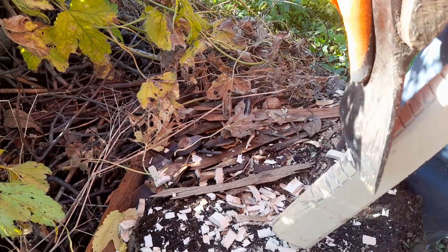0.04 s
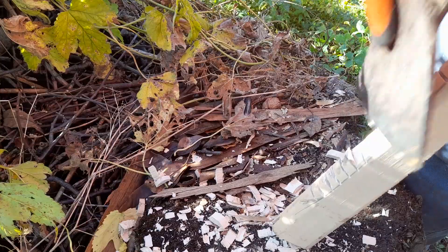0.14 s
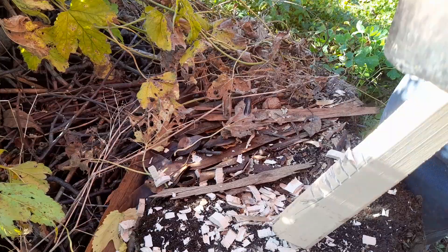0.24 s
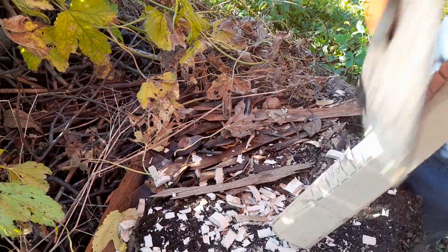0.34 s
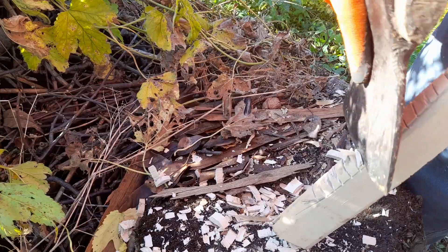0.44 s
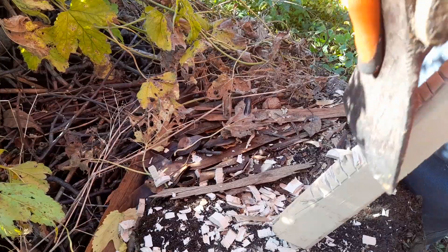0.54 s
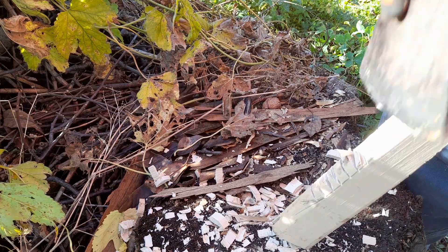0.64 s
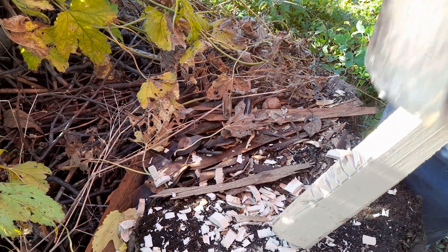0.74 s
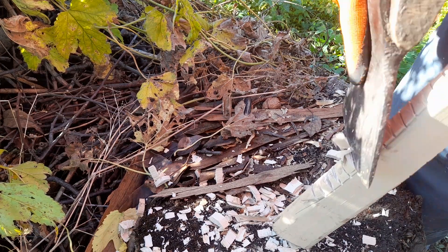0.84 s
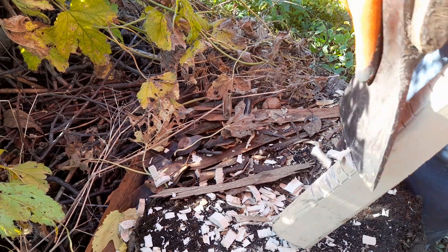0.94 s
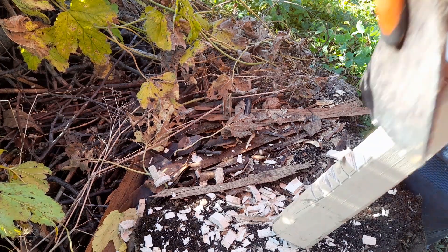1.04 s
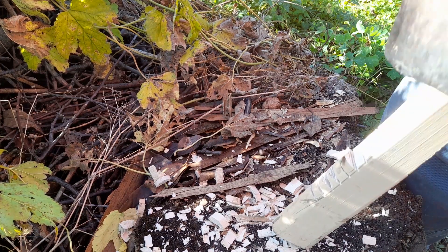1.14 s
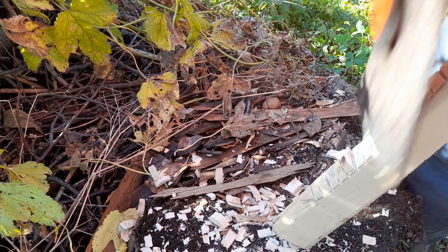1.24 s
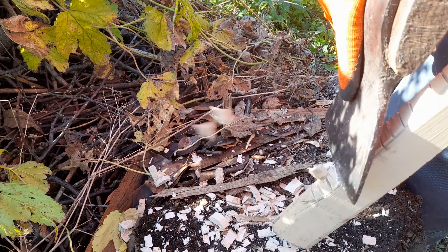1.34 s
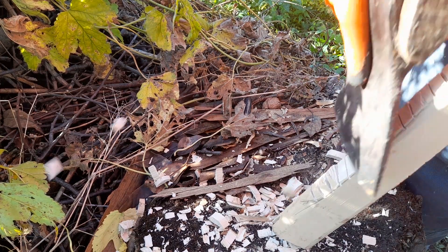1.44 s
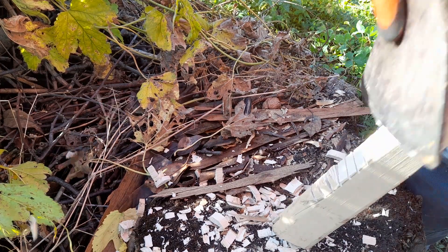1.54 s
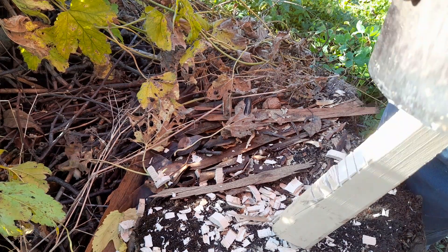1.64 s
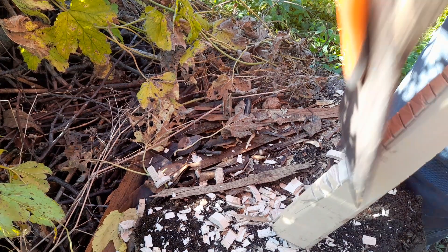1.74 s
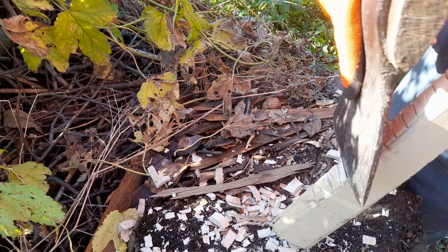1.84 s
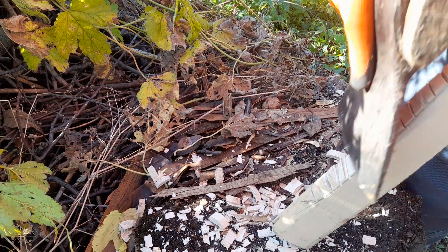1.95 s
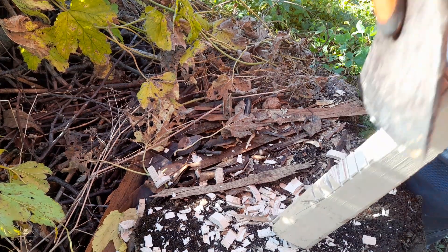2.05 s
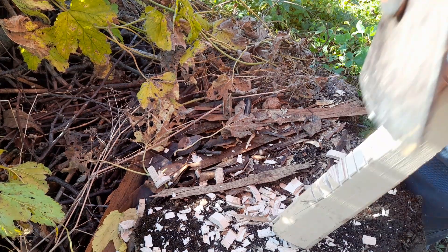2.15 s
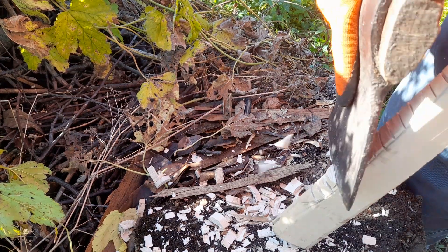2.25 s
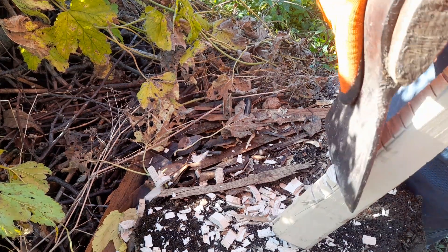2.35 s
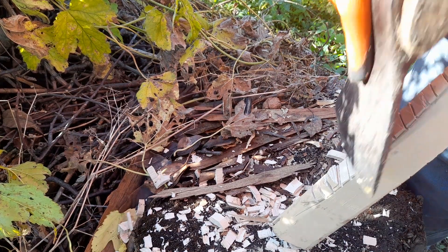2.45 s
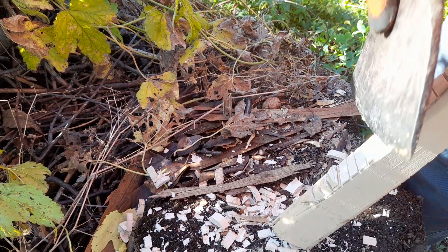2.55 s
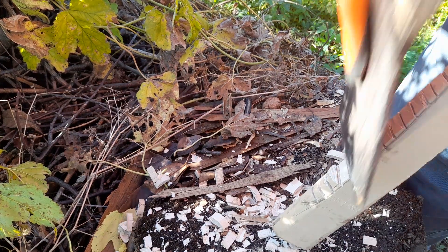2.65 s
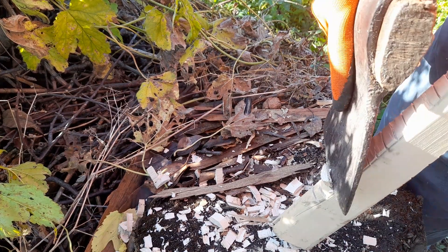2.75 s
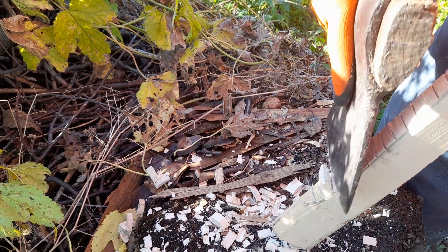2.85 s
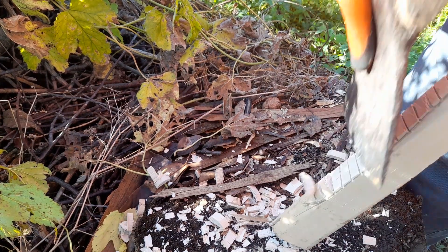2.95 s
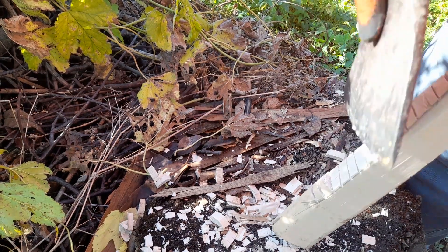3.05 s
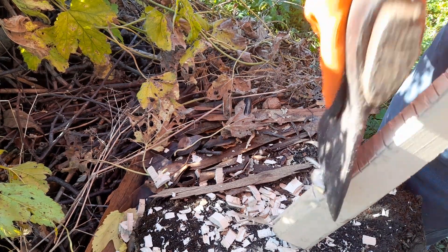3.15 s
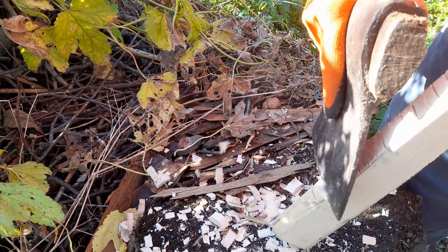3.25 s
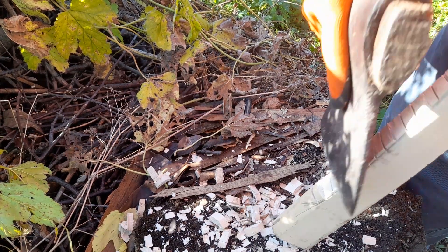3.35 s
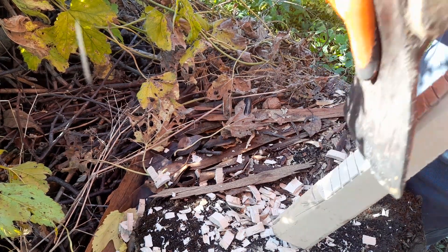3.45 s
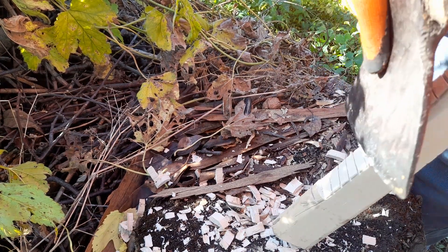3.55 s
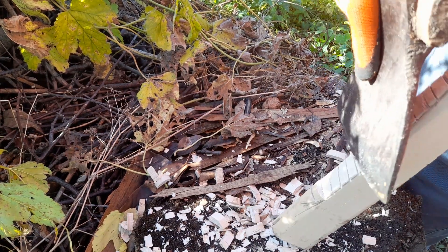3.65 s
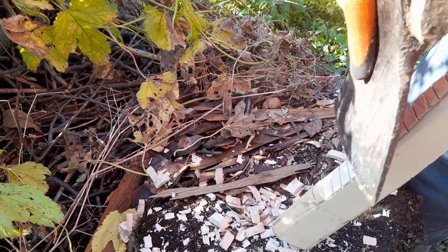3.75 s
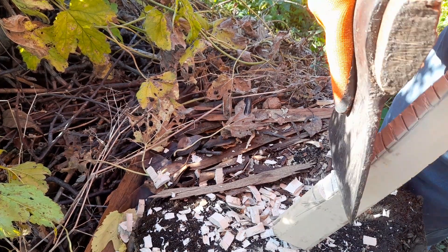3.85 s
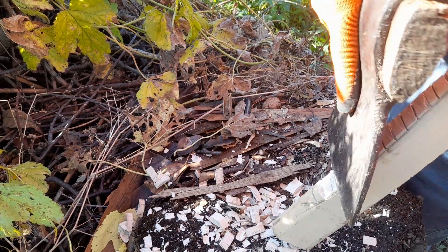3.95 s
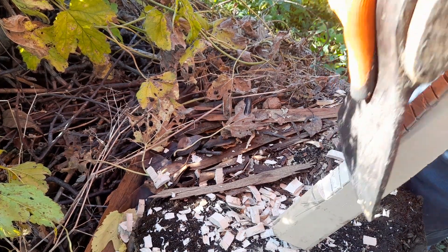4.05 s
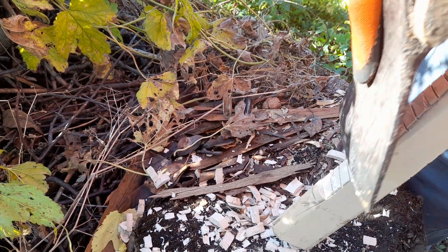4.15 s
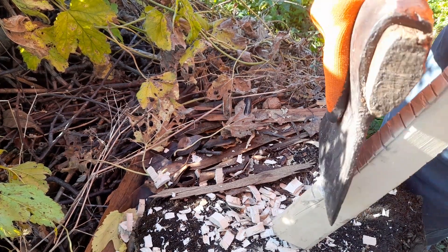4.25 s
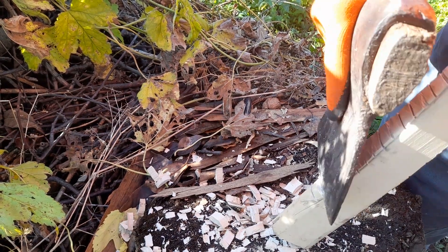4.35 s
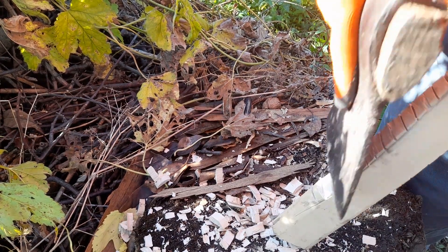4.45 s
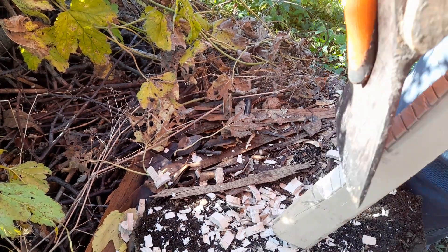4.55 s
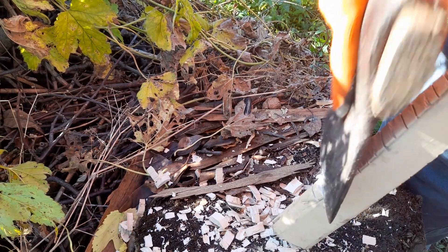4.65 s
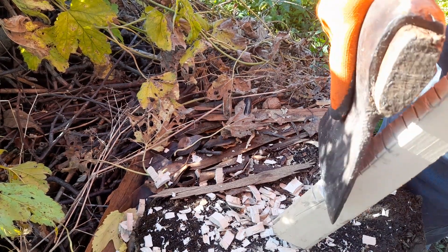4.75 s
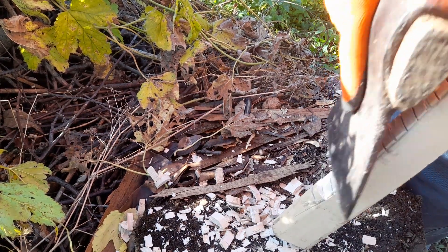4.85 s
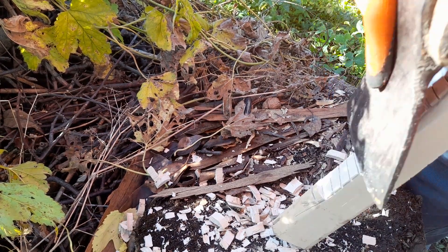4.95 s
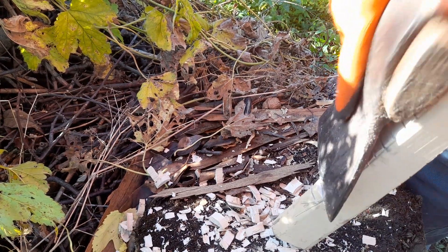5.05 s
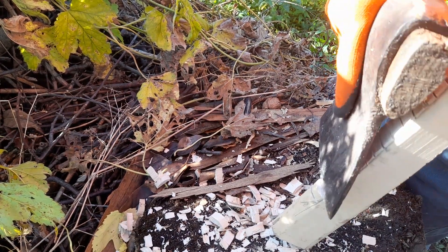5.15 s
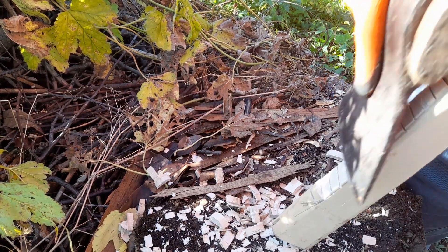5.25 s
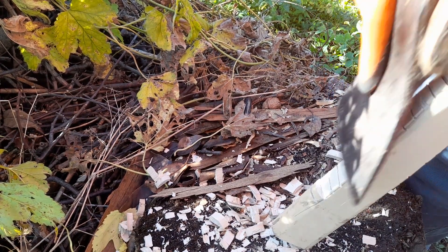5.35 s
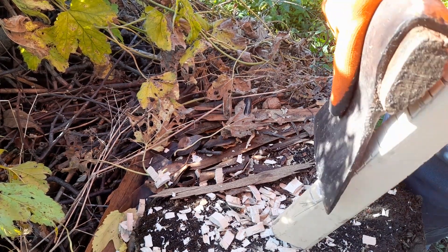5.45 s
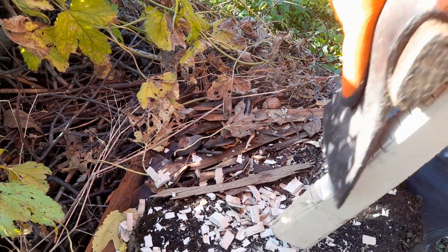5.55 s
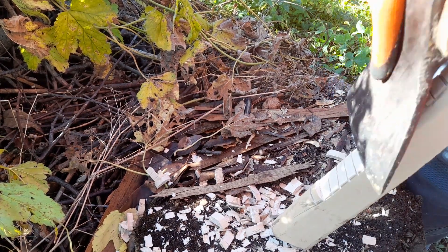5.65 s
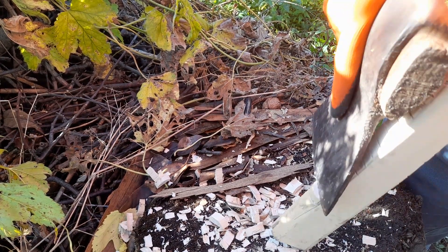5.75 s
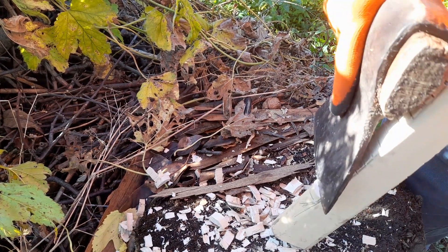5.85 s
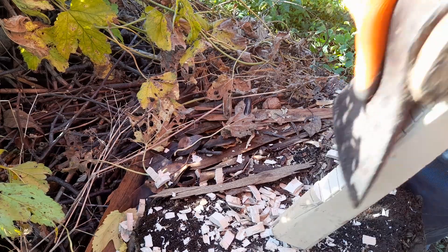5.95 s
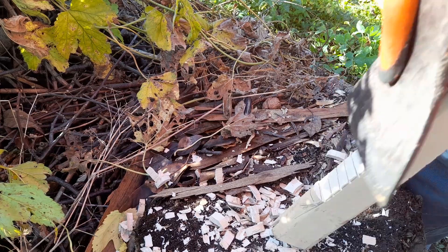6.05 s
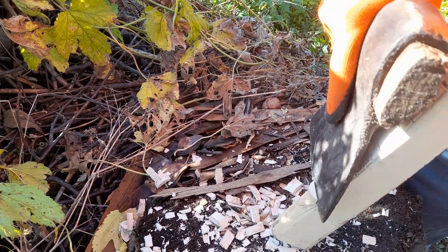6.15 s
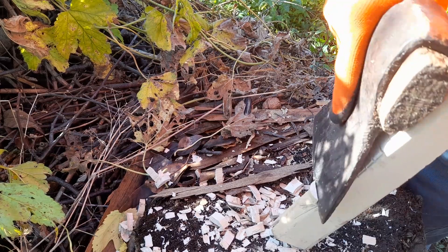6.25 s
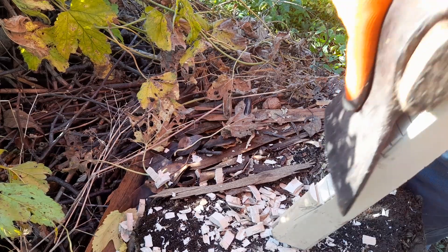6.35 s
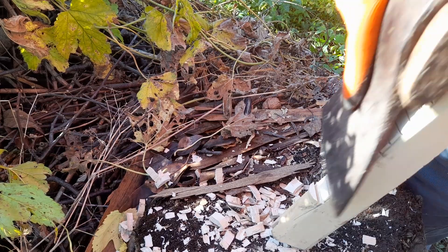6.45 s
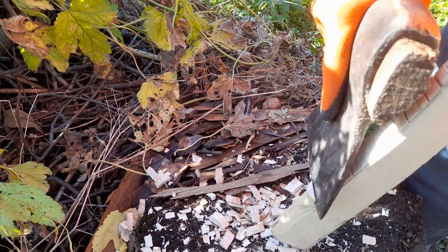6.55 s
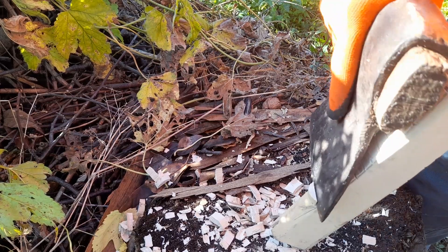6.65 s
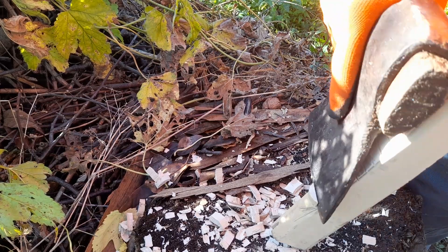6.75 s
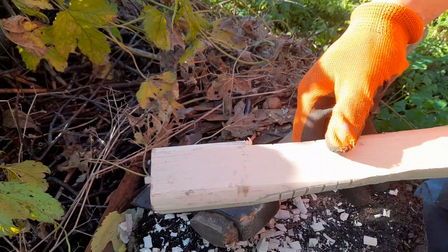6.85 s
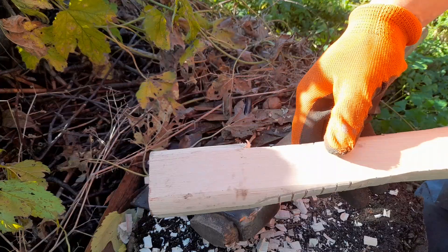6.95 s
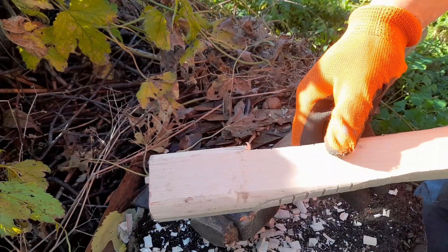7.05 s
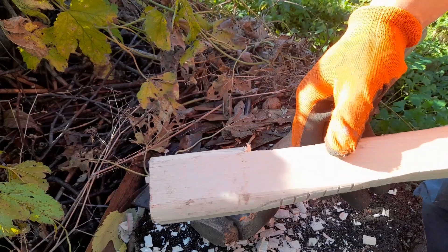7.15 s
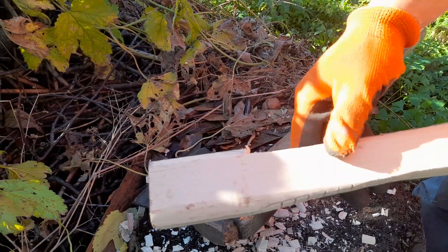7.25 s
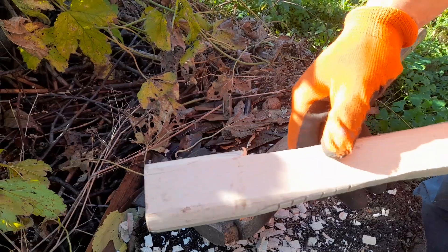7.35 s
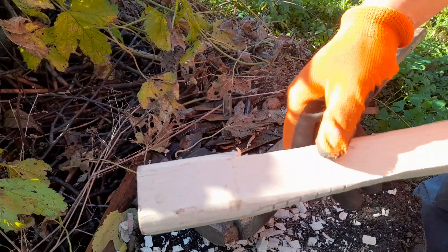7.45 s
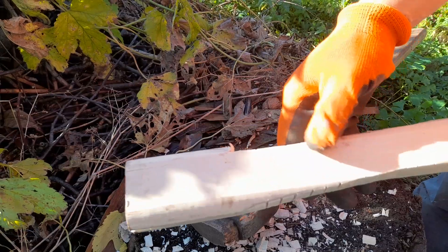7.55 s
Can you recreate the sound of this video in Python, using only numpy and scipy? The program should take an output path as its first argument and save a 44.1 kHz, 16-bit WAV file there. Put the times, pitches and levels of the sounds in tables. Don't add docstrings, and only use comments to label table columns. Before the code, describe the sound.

Outdoors, close to a stereo microphone, a hand axe hews a wooden bar. From 0 to 3.3 s eight strokes fall roughly every 0.45 s, each a sharp crack with tearing fibres, a dry hollow thud and a short bright steel ring; the stroke at 1.36 s snaps hardest. Chips tick and rustle in dry leaves, notably around 1.6, 2.5 and 3.4 s. A faint low engine slows and vanishes by 2.5 s. After a short gap, chopping resumes at 3.9 s, with strong blows at 4.3 and 4.75 s. From 5 to 6.6 s strokes come faster, about every 0.35 s, with scraping skids, small taps and thin singing steel between them. The last bite is at 6.58 s. Short scattered echoes die away; a chip ticks near 6.9 s, low wind puffs bump the right side around 7 s, then quiet hum, slight leaf rustle, hiss and a very faint rising motor whine.

```python
import sys
import numpy as np
from scipy import signal
from scipy.fft import rfft, irfft
from scipy.io import wavfile

SR = 44100
rng = np.random.default_rng(int(sys.argv[2]) if len(sys.argv) > 2 else 0)


def unload_wav(signal):
    wavfile.write(
        sys.argv[1],
        SR,
        np.round(np.clip(np.atleast_2d(signal).T, -1, 1) * 32767).astype(np.int16),
    )


def field_ratio(decibels):
    return 10 ** (np.asarray(decibels, dtype=float) / 20)


N = 335160


def rms_one(x):
    return x / np.sqrt(np.mean(x ** 2) + 1e-20)


def coloured(x, spectrum):
    hz, db = np.transpose(spectrum)
    bins_hz = np.arange(4097) * SR / 8192
    log_gain = np.log(field_ratio(np.interp(np.log(bins_hz + 1), np.log(hz), db)))
    cepstrum = irfft(log_gain) * np.r_[1, np.full(4095, 2), 1, np.zeros(4095)]
    kernel = irfft(np.exp(rfft(cepstrum)))
    kernel = kernel / np.sqrt(np.sum(kernel ** 2))
    kernel = kernel.reshape((1,) * (x.ndim - 1) + (-1,))
    return signal.oaconvolve(x, kernel, axes=-1)[..., :N]


def drift(rate):
    r = np.exp(-80 * np.pi * rate / SR)
    slow = signal.lfilter([1], [1, -2 * r, r * r], rng.standard_normal(N // 40 + 2002))[2000:]
    return np.interp(np.arange(N) / 40, np.arange(len(slow)), rms_one(slow))


def ring(x, hz, t60):
    r = field_ratio(-60 / (t60 * SR))
    w = 2 * np.pi * hz / SR
    return signal.lfilter([0, np.sin(w)], [1, -2 * r * np.cos(w), r * r], x + 1e-18)


def clicks(times, sizes):
    return np.bincount((np.asarray(times) * SR).astype(int), sizes, N)[:N]


def grains(per_s, spread_db):
    sizes = field_ratio(spread_db * np.minimum(rng.exponential(1, N), 4)) * rng.choice([-1, 1], N)
    return rms_one(sizes * (rng.random(N) < per_s / SR))


def spread(per_s, spread_db, own):
    return grains(per_s, spread_db) + own * np.array([grains(per_s, spread_db) for _ in range(2)])


def strokes(tables, edge_s):
    t = np.arange(N) / SR
    out = np.zeros((len(tables[0][0]) - 1, N))
    for rows in tables:
        s, *columns = np.transpose(rows)
        s = np.r_[s[0] - edge_s, s, s[-1] + 4 * edge_s]
        span = slice(max(0, int(s[0] * SR)), int(s[-1] * SR))
        for k, db in enumerate(columns):
            faded_db = np.r_[db[0] - 30, db, db[-1] - 30]
            out[k, span] += field_ratio(np.interp(t[span], s, faded_db))
    return out


def ramps(rows, edge_s):
    return strokes([[(a, b0, h0), (b, b1, h1)] for a, b, b0, b1, h0, h1 in rows], edge_s)


# time in seconds, wind level in dB, far hum level in dB.
AIR_LEVELS = [(0.0, -51.5, -77), (0.21, -53, -67), (0.74, -54.5, -64), (0.99, -63.5, -64.5),
              (1.418, -53, -65), (2.14, -60, -73.5), (3.02, -60, -76), (3.281, -54, -62), (3.581, -66, -77),
              (3.851, -57, -75), (4.36, -51.5, -67.5), (4.569, -60, -75.5), (5.079, -54, -74.5),
              (5.45, -66.5, -78.5), (6.012, -54.5, -67), (6.501, -65.5, -70), (7.03, -61, -75),
              (7.26, -74, -76.5)]
# frequency in Hz, density in dB per Hz.
WIND_COLOUR = [(15, -60), (25, -34.5), (43, -5.5), (113, -1.5), (152, -13.5), (230, -28.5), (340, -46.5),
               (570, -120)]
# time in seconds, level in dB, pitch in Hz.
PUFFS = [(6.872, -39, 70.4), (6.991, -27.5, 73.5), (7.061, -36, 69.3), (7.117, -20, 61.4)]


def wind():
    s, wind_db, _ = np.transpose(AIR_LEVELS)
    turbulence = rng.standard_normal(N) + 2.2 * rng.standard_normal((2, N))
    level_db = np.interp(np.arange(N) / SR, s, wind_db) - 3.0 + 2.0 * drift(2.8)
    out = coloured(turbulence, WIND_COLOUR) * field_ratio(level_db)
    for s, db, hz in PUFFS:
        push = ring(clicks([s], [field_ratio(db - 37.5)]), hz, 0.1)
        out[1] -= ring(push, hz * 2.0, 0.036)
    return out


# frequency in Hz, density in dB per Hz.
HUM_COLOUR = [(120, -37), (200, -7), (308, -3.5), (620, -18.5), (868, -13.5), (4500, -38.5), (6500, -66),
              (11000, -120)]


def hum():
    s, _, hum_db = np.transpose(AIR_LEVELS)
    noise = rng.standard_normal((2, N)) + .5 * rng.standard_normal(N)
    return coloured(noise, HUM_COLOUR) * field_ratio(np.interp(np.arange(N) / SR, s, hum_db) + 1.2 * drift(5))


# time in seconds, pitch in Hz, level in dB.
WHINE_PATH = [
    (7.199, 1244, -96.5),
    (7.361, 1344, -89),
    (7.5, 1390, -89),
    (7.6, 1590, -88),
]


def whine():
    t = np.arange(N) / SR
    s, hz, db = np.transpose(WHINE_PATH)
    turns = 2 * np.pi * np.cumsum(np.interp(t, s, hz) + 60 * drift(40)) / SR
    return (np.sin(turns) + .2 * np.sin(2.15 * turns)) * field_ratio(np.interp(t, s, db) + 5 * drift(12))


# time in seconds, firing rate in Hz, level in dB.
ENGINE_PATH = [
    (0, 31.91, -49.5),
    (0.9, 30.29, -47),
    (1.301, 28.32, -50),
    (1.9, 25.43, -51),
    (2.499, 24.55, -90),
]
# multiple of the firing rate, level in dB.
ENGINE_ORDERS = [(2, -9), (3, -1.5), (4, 0)]


def engine():
    t = np.arange(N) / SR
    s, hz, db = np.transpose(ENGINE_PATH)
    phase = 2 * np.pi * np.cumsum(np.interp(t, s, hz) + 0.14 * drift(7.1)) / SR
    orders = sum(np.sin(k * phase) * field_ratio(order_db + 5.4 * drift(1.0)) for k, order_db in ENGINE_ORDERS)
    return field_ratio(np.interp(t, s, db)) * orders


# frequency in Hz, density in dB per Hz.
HISS_COLOUR = [(880, -35), (1500, -1), (3310, -7), (6000, -1), (7930, -9.5), (14300, 3.5), (16000, -6.5),
               (16500, -28)]
HISS_DB = -77.5


def air():
    hiss = field_ratio(HISS_DB + 1.0) * coloured(rng.standard_normal((2, N)), HISS_COLOUR)
    return wind() + engine() + hum() + whine() + hiss


# start in seconds, rise in seconds, fall in seconds, peak in dB.
RUSTLES = [(1.579, .003, 0.0039, -58), (1.59, 0.015, 0.06, -49.5), (1.648, 0.0056, 0.068, -61),
           (1.8, .004, 0.038, -75.5), (2.492, 0.0047, 0.12, -64), (3.185, 0.0035, 0.017, -61),
           (3.411, 0.0039, 0.1, -67), (7.282, 0.097, 0.15, -72)]
RUSTLE_RISE_DB, RUSTLE_FALL_DB = 9, 15
# time in seconds, peak in dB, centre in Hz, left-right balance in dB.
CHIPS = [(.7203, -54, 3000, 10), (.727, -60, 5000, 10), (1.133, -45, 7500, 3), (1.143, -57, 7000, 3),
         (1.219, -60, 10000, 5), (1.6503, -46, 3500, 15), (1.719, -63, 9000, 6), (1.7726, -63, 2530, 9),
         (1.802, -60, 4000, 8), (2.4973, -50.5, 5560, 13), (2.5198, -53.5, 6850, 3),
         (2.5467, -54.5, 5370, 15), (2.6455, -56, 14000, 6), (3.1164, -56, 9000, 5), (3.129, -62, 4000, 5),
         (3.1422, -51.5, 2010, 7), (3.1424, -58, 13000, 5), (3.1866, -53, 4000, 5), (3.409, -44, 5000, 7),
         (3.4105, -48, 13000, 5), (3.449, -64, 5500, 5), (3.4774, -57, 3500, 6), (3.5115, -54, 11000, 5),
         (4.0268, -49, 12000, 6), (4.072, -57, 14000, 6), (4.082, -60, 7000, 6), (4.637, -62, 9000, 5),
         (6.8623, -63, 2500, -9), (6.8779, -46, 13600, -4.5)]


def leaves():
    rustle, = strokes([[(s, db - RUSTLE_RISE_DB), (s + rise_s, db), (s + rise_s + fall_s, db - RUSTLE_FALL_DB)]
                       for s, rise_s, fall_s, db in RUSTLES], edge_s=0.0031)
    crackle = grains(5700, spread_db=2.5) * rustle * field_ratio(2.0 * drift(54))
    dry_leaf = [(2500, -19.5), (4500, -13.5), (9000, -18.0), (15500, -5.5), (16500, -27)]
    out = coloured(crackle, dry_leaf) * field_ratio([[2], [-3]])
    for s, db, hz, pan_db in CHIPS:
        i = int(s * SR)
        tick = rng.standard_normal(600) * field_ratio(-60 * np.arange(600) / SR / 0.0063)
        band = signal.butter(2, [hz * 0.5, min(hz * 2, 17000)], "band", fs=SR, output="sos")
        tick = signal.sosfilt(band, tick)
        out[:, i:i + 600] += field_ratio(db) * tick / abs(tick).max() * field_ratio([[pan_db / 2], [-pan_db / 2]])
    return out


# band in Hz, level in dB, decay t60 in seconds.
TAIL = [(147.6, -37.5, 0.4), (400, -30, 0.27), (1300, -20.5, 0.092), (3860, -29, 0.34),
        (12163, -36.5, 0.16)]
# frequency in Hz, level in dB, decay t60 in seconds.
HOLLOW = [(930, -46, .14), (1800, -43, .18), (2900, -48, .12)]


def garden(x):
    t = np.arange(SR // 3) / SR
    out = np.zeros((2, N + SR))
    starts = [0] + [int((s - .01) * SR) for s, *_ in BITES[1:]] + [N]
    shape = (len(BITES), 2, len(t))
    tails = 0
    for hz, db, t60 in TAIL:
        band = signal.butter(1, [hz * 0.85, min(hz * 2.0, 18000)], "band", fs=SR, output="sos")
        tails = tails + signal.sosfilt(band, rng.standard_normal(shape)) * field_ratio(db - 24.5 - 60 * t / t60)
    for hz, db, t60 in HOLLOW:
        tails = tails + ring(rng.standard_normal(shape), hz, .008) * field_ratio(db - 36.5 - 60 * t / t60)
    tails = tails * np.clip(t / .005, 0, 1)
    for a, b, tail, (*_, echo_db) in zip(starts, starts[1:], tails, DEEPEST):
        out[:, a:b + len(t) - 1] += field_ratio(echo_db) * signal.fftconvolve(x[None, a:b], tail, axes=1)
    return out[:, :N]


THUMP_HZ, THUMP_DB, THUMP_T60_S = 54, -30, 0.069


def ground():
    s, db = np.transpose(blows())[:2]
    push = signal.lfilter([.01], [1, -.99], clicks(s, field_ratio(db / 2 + THUMP_DB)))
    return ring(push, THUMP_HZ, THUMP_T60_S)


def choked(x, hz, t60):
    parts = np.split(x, [int(s * SR) for s, *_ in DEEPEST])
    return np.concatenate([ring(part, hz, t60) for part in parts])


# start in seconds, end in seconds, body level in dB, steel level in dB, swell in dB.
DRAGS = [(1.066, 1.148, -64, -65, -9), (4.092, 4.178, -54.5, -72, -22.5), (4.925, 5.04, -81, -72.5, -15),
         (5.308, 5.4, -58, -62, -0.5), (5.66, 5.739, -52, -54.5, -4), (6.038, 6.105, -48.5, -50.5, 0),
         (6.395, 6.486, -65, -63.5, 4.5)]
STEEL_SWELL, STEEL_FADE_DB = 0.49, 3
CREEP_S, CREEP_FROM_DB, CREEP_TO_DB = 0.049, -17.5, -5
SKID_STEEL_DB = -11.5
# frequency in Hz, level in dB, decay t60 in seconds.
HEAD = [(2590, 1.5, .09), (3840, -18, .1), (4300, -14, .1), (5265, -2, .09), (6410, -6, .12),
        (8545, -5, .15), (10600, -6, .15), (12400, -12, .15), (12520, -6, .15), (15200, -18, .08)]


def dragging():
    drags = [(a, b, db, db + swell_db, steel_db, steel_db + STEEL_SWELL * swell_db - STEEL_FADE_DB)
             for a, b, db, steel_db, swell_db in DRAGS]
    skids = [(a, b, -90, -90, db + SKID_STEEL_DB - swell_db / 2, db + SKID_STEEL_DB)
             for a, b, db, swell_db in SKIDS]
    creeps = [(a - CREEP_S, a, *[steel_db + CREEP_FROM_DB, steel_db + CREEP_TO_DB] * 2)
              for a, b, db, steel_db, swell_db in DRAGS]
    body, steel = ramps(drags + creeps + skids, edge_s=0.0019)
    slips = grains(900, spread_db=4.5)
    rub = grains(4000, spread_db=4.0)
    pace = drift(22)
    # Hz, dB, t60 s
    bar_modes = [(437.0, -3.0, 0.04), (544, 1.5, 0.045), (933.0, -11.5, 0.062), (1480, -10.5, 0.077),
                 (1847, -20.5, 0.054)]
    wood = sum(ring(slips * body, hz, t60) * field_ratio(db) for hz, db, t60 in bar_modes)
    head = 0
    for k, (hz, db, t60) in enumerate(HEAD):
        own_rub = np.roll(rub, 5000 * k) * steel * field_ratio(4 * np.roll(pace, 9000 * k))
        head = head + choked(own_rub, hz, t60) * field_ratio(db)
    scrape_colour = [(500, -10.5), (1500, -2.0), (2100, -1.0), (3100, -9), (3900, -2), (4700, -9.0),
                     (8000, -16.5), (16000, -24.5)]
    scrape = coloured(rub * steel * field_ratio(4.0 * pace), scrape_colour)
    return field_ratio(-24.0) * wood + field_ratio(-30.5) * head + field_ratio(-5) * scrape


# start in seconds, frequency in Hz, level in dB.
PINGS = [(.03, 4300, -50), (.468, 5350, -44), (1.08, 10620, -59), (1.1, 2590, -63), (1.391, 8600, -52),
         (1.5, 8570, -59), (1.53, 5270, -66), (1.53, 2585, -64), (2.035, 5265, -75), (3.41, 2590, -76),
         (3.55, 2590, -80), (4.101, 2590, -68), (4.165, 2590, -62), (5.495, 6450, -52), (5.845, 2640, -42),
         (6.065, 2600, -52), (4.101, 5265, -71), (4.101, 6410, -61), (6.085, 5265, -57), (6.452, 6410, -59)]
# frequency in Hz, decay t60 in seconds.
PING_T60 = [(2600, 2.2), (4000, .15), (5300, .4), (6400, .2)]
BURIED_T60_S = .2


def pings():
    out = np.zeros(N)
    bites = np.array(BITES)[:, 0]
    for s, hz, db in PINGS:
        next_bite = bites[bites > s + .02][0]
        t = np.arange(int((next_bite - s) * SR)) / SR
        t60 = np.interp(hz, *np.transpose(PING_T60))
        if s - bites[bites < s][-1] < .05:
            t60 = BURIED_T60_S
        level = field_ratio(db - 60 * t / t60 + 2.5 * np.sin(2 * np.pi * 13.0 * t))
        swell = np.clip(t / (0.015 * t60), 0, 1)
        out[int(s * SR):][:len(t)] += level * swell * np.sin(2 * np.pi * hz * t)
    return out


# time in seconds, steel ring in dB, wood ring in dB, echo in dB.
DEEPEST = [(.016, -34, -27, 4), (.465, -20.5, -39.5, 2.5), (0.906, -33, -26, 2.5), (1.375, -17, -26.5, 3.5),
           (1.855, -20, -11.5, 5), (2.311, -22, -26.5, 2.5), (2.774, -35.5, -30, 0.5),
           (3.236, -26.5, -33, 4), (3.917, -45, -37, 5), (4.323, -34, -19, 0), (4.754, -26.5, -19, 0),
           (5.146, -31.5, -21.5, -2.5), (5.488, -33.5, -23, -2), (5.838, -46, -21.5, 0),
           (6.212, -28.5, -29, 0), (6.579, -50, -18, 1)]
# frequency in Hz, level in dB, decay t60 in seconds.
STEEL_RINGS = [
    [(4285, 0, 0.092), (6535, -1, 0.051), (12440, -4, 0.1)],
    [(5351, 0, 0.036), (10900, -11, 0.038), (12680, -6, 0.022)],
    [(4366, 0, 0.035), (6535, -9, 0.062), (10770, -7, 0.045)],
    [(8629, -8, 0.065), (10890, 0, 0.048), (12410, -5, 0.072)],
    [(3984, 0, 0.018), (10780, -21, 0.036), (12470, -26, 0.07)],
    [(5453, 0, 0.027), (8651, -3, 0.029), (10890, -2, 0.028)],
    [(5335, -11, 0.07), (8753, 0, 0.034), (12440, -6, 0.072)],
    [(5270, 0, 0.045), (6471, -3, 0.06), (12430, -19, 0.5)],
    [(5319, 0, 0.055), (10680, -10, 0.092), (12510, -9, 0.11)],
    [(4904, 0, 0.032), (6363, -1, 0.027), (12350, -6, 0.03)],
    [(4936, -1, 0.04), (6282, 0, 0.034), (11960, -4, 0.03)],
    [(4883, -13, 0.024), (6272, -1, 0.013), (12340, 0, 0.011)],
    [(6460, -10, 0.095), (8656, 0, 0.049), (12600, -4, 0.069)],
    [(5340, 0, 0.029), (11500, -26, 0.064), (12380, -18, 0.063)],
    [(5459, -14, 0.086), (8549, -25, 0.057), (12350, 0, 0.028)],
    [(4608, 0, 0.035), (6433, -11, 0.063), (8689, -22, 0.05)],
]
# frequency in Hz, level in dB, decay t60 in seconds.
WOOD_RINGS = [
    [(850, 1.5, 0.045), (2120, -0.5, .025)],
    [(1533, -6.5, 0.034), (3065, -4.5, 0.027)],
    [(1830, -6, 0.034), (2842, -4.5, 0.023)],
    [(1214, -6, 0.09), (3010, 0, 0.085)],
    [(917, -14, 0.058), (2710, -11.5, 0.019)],
    [(940, 1.5, 0.062), (1570, -1.5, 0.025)],
    [(687, -2.5, 0.1), (1830, -5, 0.055)],
    [(667, -3.5, 0.14), (1533, -11, 0.63)],
    [(806, -17, 0.049), (1440, -9, 0.08)],
    [(668, -9, 0.042), (963, -2, .03)],
    [(900, -1.5, 0.044), (1800, -4, 0.044)],
    [(979, -2.5, 0.057), (2582, -3, 0.036)],
    [(2020, -8.5, 0.0535), (2697, -4, 0.03)],
    [(938, 3, 0.072), (2590, -1.5, 0.078)],
    [(2640, 4.5, 0.052), (3110, -20, 0.11)],
    [(745, -10, 0.088), (2100, 8, 0.02)],
]
# time in seconds, peak in dB.
CATCHES = [(5.317, -55), (5.384, -61), (5.46, -40.5), (5.657, -43.5), (5.719, -41), (5.823, -37.5),
           (6.034, -43), (6.083, -35.5), (6.165, -44), (6.285, -50.5), (6.402, -49), (6.477, -41),
           (6.506, -58)]
# frequency in Hz, level in dB, decay t60 in seconds.
CATCH_MODES = [(462, 1.5, 0.036), (901, -12.5, 0.027), (1468.4, -8.5, 0.04), (1946, -11.5, .025)]


def ringing():
    t = np.arange(8000) / SR
    out = np.zeros(N)
    modes = []
    for (s, steel_db, wood_db, _), steel, wood in zip(DEEPEST, STEEL_RINGS, WOOD_RINGS):
        modes += [(s, hz, steel_db + db, t60) for hz, db, t60 in steel]
        modes += [(s, hz, wood_db + db, t60) for hz, db, t60 in wood]
    for s, db in CATCHES:
        modes += [(s, hz, db + mode_db, t60) for hz, mode_db, t60 in CATCH_MODES]
    for s, hz, db, t60 in modes:
        out[int(s * SR):][:len(t)] += field_ratio(db - 60 * t / min(t60, .2)) * np.sin(2 * np.pi * hz * t)
    return out


# time in seconds, peak in dB.
SNAPS = [(0.015, -20.5), (0.017, -13), (0.4651, -19), (0.472, -27.5), (0.909, -10), (0.913, -19),
         (1.3553, -5), (1.3717, -13), (1.384, -13.5), (1.854, -17.5), (2.3088, -27.5), (2.313, -9),
         (2.761, -26), (2.771, -21), (3.2257, -16.5), (3.235, -15), (3.917, -28), (3.9355, -47),
         (3.951, -41.5), (4.3258, -19.5), (4.7353, -11.5), (4.7536, -10.5), (4.762, -9), (5.1486, -19),
         (5.1482, -8.5), (5.4921, -24.5), (5.839, -11.5), (6.2142, -21), (6.2274, -23), (6.578, -32)]
SNAP_T60_S = .016
# start in seconds, end in seconds, body level in dB,
# fibre hiss in dB, fade along the cut in dB.
CUTS = [(0.014, 0.034, -25.5, -31, -0.5), (0.463, .475, -18, -26, 12), (0.904, 0.915, -27.5, -29, -0.5),
        (1.361, 1.397, -21, -32.5, 9.5), (1.854, 1.863, -22.5, -39.5, 4.5), (2.301, 2.321, -25, -31.5, 8),
        (2.759, 2.781, -21.5, -34.5, 1), (3.223, 3.26, -20, -32, 12.5), (3.9165, 3.922, -30.5, -43.5, 2.5),
        (4.296, 4.328, -24.5, -35, 3.5), (4.74, 4.749, -30.5, -37.5, 5), (5.489, 5.504, -14, -29.5, 9.5),
        (5.85, 5.871, -22, -41.5, 23.5), (6.182, 6.207, -28, -49, 17), (6.208, 6.231, -24, -32, 15.5),
        (6.579, 6.587, -14, -32, 13)]
# start in seconds, end in seconds, final body level in dB, swell in dB.
SKIDS = [(5.072, 5.138, -36.5, 20), (5.423, 5.489, -32.5, 27.5), (5.783, 5.837, -35, 17.5),
         (6.158, 6.21, -31.5, 15.5), (6.526, 6.579, -38.5, 21)]
SKID_HISS_DB, SKID_HISS_SWELL = -16.5, 0.85
# frequency in Hz, density in dB per Hz.
FIBRE_COLOUR = [(880, -19.5), (1500, -1.5), (3700, -7.5), (5320, -10.5), (8070, -14.5), (12600, -12.5),
                (15700, -20), (16900, -35.5)]
# frequency in Hz, level in dB, decay t60 in seconds.
GRIPPED = [(3970, -20, .08), (4300, -10, .12), (5400, -6, .1), (6500, -6, .12), (8660, -5, .1),
           (10880, -6, .1), (6220, -12, .06), (12440, -7, .13), (15300, -18, .08)]
HELD_T60_S = 0.015


def tearing():
    cuts = [(a, b, body_db, body_db - fade_db, hiss_db, hiss_db - fade_db)
            for a, b, body_db, hiss_db, fade_db in CUTS]
    skids = [(a, b, db - swell_db, db, db + SKID_HISS_DB - SKID_HISS_SWELL * swell_db, db + SKID_HISS_DB)
             for a, b, db, swell_db in SKIDS]
    body, hiss = ramps(cuts + skids, edge_s=0.0032)
    breaks = spread(1500, 4.0, own=.3) * body * field_ratio(3 * drift(60))
    wood = 0
    for k, (hz, db, t60) in enumerate(BAR[3:]):
        wood = wood + ring(breaks, hz, t60) * field_ratio(db) * (-1) ** k
    for s, db in SNAPS:
        i = int((s + 0.001) * SR)
        hiss[i:i + 4000] += field_ratio(db - 9.0 - 60 * np.arange(4000) / SR / SNAP_T60_S)
    fibres = spread(7000, 4.0, own=.7) * hiss * field_ratio(2.5 * drift(70))
    grip = field_ratio(3.5 * drift(2.5))
    steel = 0
    for k, (hz, db, t60) in enumerate(GRIPPED):
        held = ring(fibres * np.roll(grip, 30000 * k), hz, HELD_T60_S)
        singing = ring(fibres * np.roll(grip, -17000 * k), hz, 0.34 * t60)
        steel = steel + (held + 0.023 * singing) * field_ratio(db)
    return field_ratio(-23.5) * wood + field_ratio(-1.0) * coloured(fibres, FIBRE_COLOUR) + field_ratio(-26.5) * steel


# time in seconds, peak in dB, thud in dB,
# pitch under the edge in Hz, hardness in dB.
BITES = [(0.014, -11, -5, 812, 5.5), (0.461, -14, -21, 490, 7.5), (0.902, -13, -3, 714, 8.5),
         (1.356, -12, -7, 500, 4), (1.853, -15, -2.5, 764, -39), (2.3, -14.5, -19, 764, -16.5),
         (2.759, -13, -11, 747, 3.5), (3.222, -12.5, -17, 780, 2), (3.916, -13.5, -12, 778, -10),
         (4.294, -15.5, -7, 800, -23.5), (4.734, -12.5, -15, 786, -0.5), (5.146, -1, -7, 468, -1),
         (5.487, -3, -6, 459, -3.5), (5.838, -4, -11.5, 521, -7), (6.209, -17, -12.5, 505, -19.5),
         (6.578, -7.5, -3.5, 750, -20.5)]
# time in seconds, peak in dB, thud in dB, hardness in dB.
STOPS = [(0.021, -11.5, -18, 7.5), (0.03, -22, -23.5, -32), (0.034, -25, 1, -1.5), (0.466, -10, -5.5, -33),
         (0.911, -6.5, -20, -2), (1.371, -23, -4, -14), (1.384, -18, -17.5, -6),
         (2.308, -15.5, -13.5, -4.5), (2.314, -29, 6, -23.5), (2.776, -9.5, 1.5, -23),
         (3.236, -14, -4.5, -30), (3.251, -22, 6, -18), (4.3214, -3, -5, -6.5), (4.751, -0.5, -32.5, 4),
         (4.762, -19, 5.5, -14.5), (5.47, -29.5, -16.5, -6), (6.184, -30, -34, -17), (6.217, -31, 16, 4.5)]
STOP_HZ, STOP_HZ_PER_DB = 451, -3
# time in seconds, peak in dB.
TAPS = [(1.077, -52), (4.1, -43.5), (5.072, -42), (5.34, -37.5), (5.366, -35.5), (5.683, -38), (5.705, -37),
        (5.787, -39.5), (6.066, -32), (6.443, -39), (6.457, -41)]
TAP_HZ, TAP_THUD_DB, TAP_HARD_DB = 455, -15, -8


def blows():
    stops = [(s, db, thud_db, STOP_HZ + STOP_HZ_PER_DB * db, hard_db) for s, db, thud_db, hard_db in STOPS]
    taps = [(s, db, TAP_THUD_DB, TAP_HZ, TAP_HARD_DB) for s, db in TAPS]
    return sorted(BITES + stops + taps)


# frequency in Hz, level in dB, decay t60 in seconds.
BAR = [(106.6, -4, .08), (157, 6, 0.062), (209.5, 8.5, 0.049), (319, 0, 0.019), (460, -4, 0.019),
       (629, 1, 0.024), (792, 2, 0.012), (998, -1.5, 0.015), (1465, -1.5, 0.0087), (1914, -3, 0.024),
       (2774, -9, 0.017)]
BITE_S = .0011
FLEX_DB_PER_DB = 1.26
GRIP_SHIFT = .04


def knocks():
    struck = blows()
    chance = rng.standard_normal((len(struck), 2, len(BAR)))
    t = np.arange(5000) / SR
    out = np.zeros(N)
    hz, db, t60 = np.transpose(BAR)[:, :, None]
    for (s, peak_db, thud_db, own_hz, hard_db), (strength, shift) in zip(struck, chance[..., None]):
        share_db = np.repeat([thud_db, -3.1, hard_db], [3, 5, 3])[:, None]
        share_db[7] = share_db[7] + FLEX_DB_PER_DB * (peak_db + 10.5)
        level = field_ratio(share_db + db + 2.0 * strength - 60 * t / t60)
        modes = level * np.sin(2 * np.pi * hz * (1 + GRIP_SHIFT * shift) * t)
        own_t60 = np.interp(peak_db, [-32, -26], [.026, .014])
        own = field_ratio(6.5 - 60 * t / own_t60) * np.sin(2 * np.pi * own_hz * t)
        blow = modes[::2].sum(0) - modes[1::2].sum(0) - own
        for lag_s, size in [(BITE_S, 1), (BITE_S + 0.002371, .6)]:
            i = int((s + lag_s) * SR)
            out[i:i + len(t)] += size * field_ratio(peak_db - 7.0) * blow
    return out


# frequency in Hz, phase in radians by which left leads.
PORT_PHASE = [(0, 0), (860, -.85), (1400, -1.6), (1900, -1.4), (2900, -2.2), (3500, -3.9), (5500, -6.3),
              (7500, -8.2), (8600, -7.3), (9600, -10.6), (12500, -11.1), (16700, -13)]
# frequency in Hz, left-right balance in dB.
PORT_BALANCE = [(300, -1), (600, .5), (1100, -2.7), (2200, -2.4), (4400, .4), (8000, 5), (14000, 5)]
STANCE_RAD, STANCE_DB, STANCE_FROM_HZ = .8, 2, 1200


def ports(axe):
    hz = np.arange(N // 2 + 1) * SR / N
    balance_hz, balance_db = np.transpose(PORT_BALANCE)
    tilt_db = np.interp(np.log(hz + 1), np.log(balance_hz), balance_db) / 2
    turn = np.exp(1j * np.interp(hz, *np.transpose(PORT_PHASE)))
    left, right = irfft(rfft(axe) * [field_ratio(tilt_db) * turn, field_ratio(-tilt_db)], N)
    side = (left - right) / 2
    edges = [0] + [int((s - .03) * SR) for s, *_ in BITES[1:]] + [N]
    knots = np.log(np.geomspace(600, 16000, 12))
    for a, b, (radians, db) in zip(edges, edges[1:], rng.standard_normal((len(BITES), 2, 12))):
        hz = np.arange((b - a) // 2 + 1) * SR / (b - a)
        at = np.log(hz + 1)
        share = np.clip(hz / STANCE_FROM_HZ, 0, 1) ** 2
        angle = np.exp(1j * STANCE_RAD * share * np.interp(at, knots, radians))
        wander = angle * field_ratio(STANCE_DB * share * np.interp(at, knots, db))
        side[a:b] = irfft(rfft(side[a:b]) * wander, b - a)
    return (left + right) / 2 + side * [[1], [-1]]


RING_ECHO_DB = -9


def scene():
    thin = signal.butter(2, 95, "high", fs=SR, output="sos")
    cracks = signal.sosfilt(thin, knocks() + tearing() + dragging())
    rings = pings() + ringing()
    around = garden(cracks[0] + field_ratio(RING_ECHO_DB) * rings) + ground() + leaves() + air()
    return around + ports(cracks + rings)


def roll_off(x):
    return signal.sosfilt(signal.butter(12, 17140, fs=SR, output="sos"), x)


def record(dry):
    low_cut = signal.butter(2, 45, "high", fs=SR, output="sos")
    top_cut = signal.cheby2(10, 50, 17100, fs=SR, output="sos")
    rounded = np.tanh(signal.sosfilt(low_cut, dry))
    return roll_off(signal.sosfilt(top_cut, rounded))


dry = scene()
out = record(dry)
unload_wav(out)
```